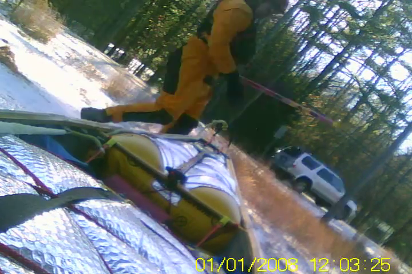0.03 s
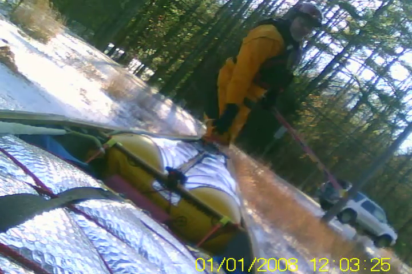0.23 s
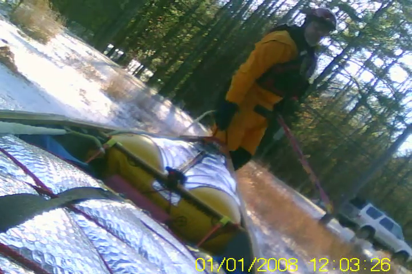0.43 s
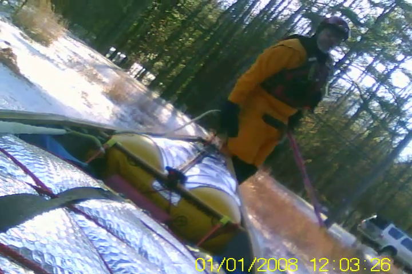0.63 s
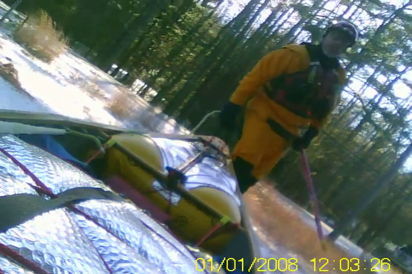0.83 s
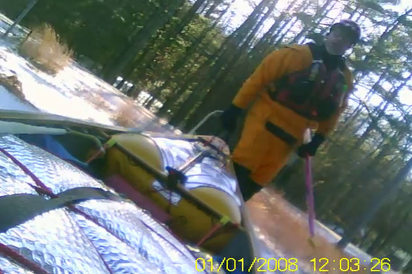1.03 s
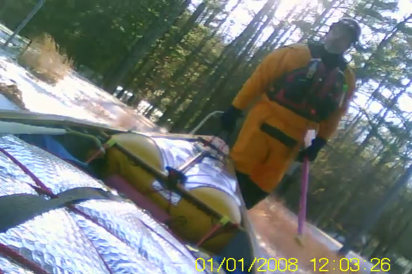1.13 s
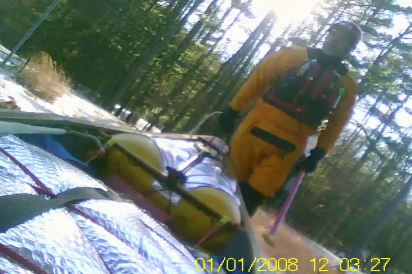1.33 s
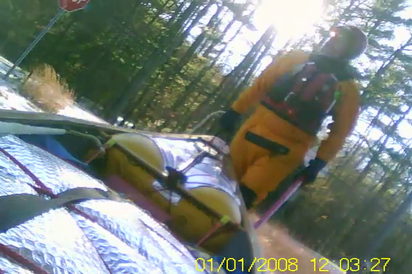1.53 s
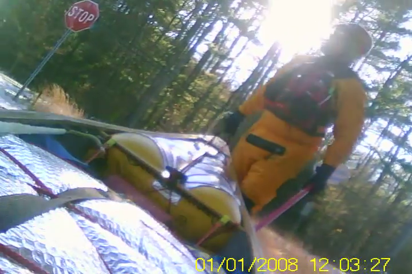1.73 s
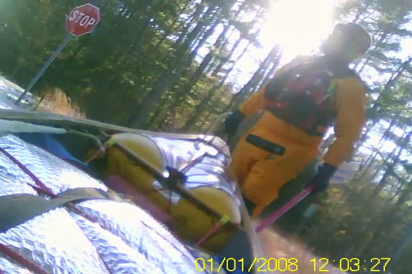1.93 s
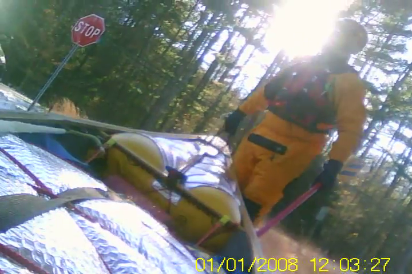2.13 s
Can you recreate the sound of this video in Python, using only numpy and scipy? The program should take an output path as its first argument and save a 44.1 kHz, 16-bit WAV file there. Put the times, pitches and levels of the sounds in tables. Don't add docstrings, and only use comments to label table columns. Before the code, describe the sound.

Rising snow scrape and crunching crusts under a dragged inflatable boat, with low booming rumbles and thumps

```python
import sys
import numpy as np
from scipy import signal
from scipy.io import wavfile

SR = 44100
rng = np.random.default_rng(int(sys.argv[2]) if len(sys.argv) > 2 else 0)


def linear_from_db(decibels):
    return 10 ** (np.asarray(decibels, float) / 20)


def wav_out(sig):
    wavfile.write(sys.argv[1], SR, np.round(np.clip(np.atleast_2d(sig).T, -1, 1) * 32767).astype(np.int16))


N = 97020
CUT_S = 2.06816

# (time [s], crunch peak [dB], drum of the floor [dB], brightness [dB])
CRUSTS = [(0.022, -36.5, -37, 3), (0.064, -47.5, -35.5, 7), (0.1, -35.5, -39, -5), (0.131, -93, -54, 2),
          (0.164, -58, -37, 9), (0.23, -31.5, -24.5, -2.5), (0.299, -34.5, -25.5, -2),
          (0.421, -37, -45.5, -2.5), (0.563, -18.5, -35, -15), (0.604, -37.5, -17.5, -4),
          (0.638, -33.5, -21.5, -18), (0.673, -24, -22.5, -4), (0.723, -13.5, -26.5, -6),
          (0.791, -30, -29, -20), (0.845, -32.5, -29.5, -20), (0.919, -10.5, -14.5, -8.5),
          (0.954, -23, -25.5, -10), (0.988, -15.5, -31, -9.5), (1.021, -29, -49, 2), (1.07, -17, -25, -16),
          (1.098, -22, -29, -3), (1.215, -28, -25, -17), (1.248, -32, -31.5, 4.5), (1.339, -21, -16.5, 0),
          (1.353, -17, -34, 2.5), (1.572, -30.5, -35, -3), (1.639, -43, -20.5, 15),
          (1.662, -32.5, -19, 10.5), (1.762, -36, -39, 7), (1.902, -25, -35, -22)]
# (time [s], swing [dB], frequency [Hz], time to fall 60 dB [s])
LURCHES = [
    (1.953, -11, 23, .25),
    (2.0375, .5, 29.5, 1.),
]


def rms_one(x):
    return x / np.sqrt(np.mean(x ** 2) + 1e-20)


def band(x, hz, width_hz):
    r = np.exp(-np.pi * width_hz / SR)
    top = np.array([1, 0, -1]) * (1 - r * r) / 2
    bottom = [1, -2 * r * np.cos(2 * np.pi * hz / SR), r * r]
    return signal.lfilter(top, bottom, x + 1e-18)


def filtered(x, order, hz, kind="low"):
    return signal.sosfilt(signal.butter(order, hz, kind, fs=SR, output="sos"), x)


def ring(x, hz, t60):
    r = linear_from_db(-60 / (t60 * SR))
    w = 2 * np.pi * hz / SR
    return signal.lfilter([0, np.sin(w)], [1, -2 * r * np.cos(w), r * r], x + 1e-18)


def struck(modes, s, db):
    chance = rng.standard_normal((len(s), len(modes)))
    out = 0
    for k, (hz, level_db, t60) in enumerate(modes):
        push = np.zeros(N)
        push[(s * SR).astype(int)] = linear_from_db(db + level_db + 0.51 * chance[:, k])
        out = out + ring(push, hz, t60)
    return out


def drift(rate):
    r = np.exp(-2 * np.pi * rate / SR)
    slow = signal.lfilter([1], [1, -2 * r, r * r], rng.standard_normal(N + SR))
    return rms_one(slow[SR:])


def resonate(x, rows, wander_db=None):
    if wander_db is None:
        wander_db = np.zeros((len(rows), 1))
    out = 0
    for k, (hz, width_hz, db) in enumerate(rows):
        wide = 1.46 * width_hz
        once = band(x * linear_from_db(wander_db[k]), hz, wide)
        out = out + (-1) ** k * linear_from_db(db) / np.sqrt(width_hz) * band(once, hz, wide)
    return out


def grains(rate):
    size_db = 1 * np.minimum(rng.exponential(1, N), 5)
    size = linear_from_db(size_db) * rng.choice([-1, 1], N)
    return rms_one(size * (rng.random(N) < rate / SR))


def crust_bursts():
    t = np.arange(N) / SR
    crunch, crisp, crack = np.zeros((3, N))
    for s, db, _, bright_db in CRUSTS:
        age = np.maximum(t - s, 0)
        body = linear_from_db(db - 9.5) * (1 - np.exp(-age / 0.0005)) * np.exp(-age / 0.011)
        crunch += body
        crisp += linear_from_db(bright_db) * body
        crack += linear_from_db(db + 7.5 + bright_db) * (1 - np.exp(-age / 0.002)) * np.exp(-age / 0.0025)
    return crunch, crisp, crack


def squeak(grit):
    t = np.arange(N) / SR
    hz, width_hz, from_s, to_s = 7550, 600, 1.86, 2.03
    tone = rms_one(band(band(grit, hz, width_hz), hz, width_hz))
    fade = np.clip(np.minimum(t - from_s, to_s - t) / .03, 0, 1)
    return linear_from_db(-72) * fade * tone


def snow(vigour_db):
    # (frequency [Hz], width [Hz], level [dB])
    housing_modes = [(321.6, 70, -5.5), (373, 46, -1), (427.6, 45.7, 2.5), (504, 72, -3.5),
                     (619.3, 75.3, -1), (870, 172, -19.5), (1099, 287, -14), (1363, 266, -25),
                     (1696, 225, -17), (2185, 240, -17.5), (2468, 117, -20), (2723, 99, -28)]
    # (frequency [Hz], width [Hz], level [dB])
    sheen_modes = [(3050, 200, -2), (3450, 400, -2), (4150, 400, -5), (4570, 170, -1), (5200, 400, -8)]
    swing = vigour_db - vigour_db.max()
    crunch, crisp, crack = crust_bursts()
    grit = grains(2500)
    clumps = linear_from_db(0.5 * drift(21))
    # (resonances, scrape level in dB, loudness of the breaking crusts)
    parts = [(housing_modes[:6], -29 + 0.84 * swing, crunch),
             (housing_modes[6:], 5.5 + vigour_db, linear_from_db(-16) * (0.54 * crisp + crack)),
             (sheen_modes, -55.5 + 1.9 * swing, linear_from_db(-47) * (0.19 * crisp + crack))]
    out = 0
    for rows, slide_db, burst in parts:
        scale = np.std(resonate(grit, rows))
        wander_db = [2.5 * drift(6.9) for _ in rows]
        out = out + resonate(grit * (linear_from_db(slide_db) * clumps + burst), rows, wander_db) / scale
    notch = band(out, 2000, 230)
    return out - notch + squeak(grit)


def tubes(heave_db):
    # (frequency [Hz], width [Hz], level [dB])
    tube_modes = [(13.2, 42, -11), (30.2, 14.6, 10), (42.24, 9, -3), (59.6, 8.2, -20), (94.9, 11, -13.5),
                  (135.6, 98, -28), (221, 120, -27.5)]
    shake = rng.standard_normal((2, N + SR))
    swing = heave_db - heave_db.mean()
    sway = linear_from_db(-8 + .35 * swing) * rms_one(resonate(shake[0], tube_modes[:2])[SR:])
    boom = linear_from_db(-4.5 + swing) * rms_one(resonate(shake[1], tube_modes[2:])[SR:])
    return linear_from_db(heave_db.mean()) * (sway + boom)


def drum():
    # (frequency [Hz], level [dB], time to fall 60 dB [s])
    floor_modes = [(93.7, 5, 0.38), (126, -14, 0.43)]
    # (frequency [Hz], level [dB], time to fall 60 dB [s])
    board_modes = [(154, -18.5, 0.17), (213.2, -11.5, 0.14), (254.5, -8, 0.055), (423, -10.5, 0.089)]
    s, crunch_db, drum_db, _ = np.transpose(CRUSTS)
    soft = filtered(struck(floor_modes, s, drum_db - 0.5), 2, 113)
    knock = filtered(struck(board_modes, s + .006, crunch_db), 2, 600)
    return -soft - knock


def snaps():
    t, shape = np.arange(N) / SR, np.zeros(N)
    for s, db, _, bright_db in CRUSTS:
        age = np.maximum(t - s, 0) / .003
        shape += linear_from_db(db + bright_db - 27) * age * np.exp(1 - age)
    return filtered(shape * rng.standard_normal(N), 3, [900, 4800], "band")


def lurches():
    t, out = np.arange(N) / SR, np.zeros(N)
    for s, db, hz, t60 in LURCHES:
        age = np.maximum(t - s, 0)
        start = 1 - np.exp(-age / .015)
        out -= linear_from_db(db - 60 * age / t60) * np.sin(2 * np.pi * hz * age) * start
    return out * (t < CUT_S)


def circuit():
    # (frequency [Hz], level [dB])
    whines = [(5599, -83), (7402, -85), (9598, -89)]
    t, ticks = np.arange(N) / SR, np.zeros(N)
    at = np.arange(.0214, CUT_S, 1 / 30)
    ticks[(at * SR).astype(int)] = linear_from_db(-42 + 1.1 * rng.standard_normal(len(at)))
    ticks = 4 * filtered(ticks, 3, [500, 3500], "band")
    hiss_db = -63 - 3.5 * (t > CUT_S)
    hiss = linear_from_db(hiss_db) * signal.lfilter([1], [1, -.4], rng.standard_normal(N))
    whine = sum(np.sqrt(2) * linear_from_db(db) * np.sin(2 * np.pi * hz * t) for hz, db in whines)
    return hiss + ticks + whine


def scene():
    # (time [s], sliding vigour [dB], heave of the tubes [dB])
    haul = [(0.0, -90, -31.5), (0.19, -72.5, -31), (0.49, -62.5, -19.5), (0.62, -59, -24.5),
            (0.79, -66, -21.5), (0.91, -59.5, -28), (0.92, -59.5, -11.5), (1.07, -61.5, -22),
            (1.1, -66, -9.5), (1.21, -52, -18.5), (1.23, -54, -9.5), (1.34, -53.5, -32.5), (1.42, -45, -6),
            (1.43, -48, -18.5), (1.54, -49, -11.5), (1.84, -46, -17), (1.89, -48, -20), (2.06, -48, -10)]
    s, vigour, heave = np.transpose(haul)
    t = np.arange(N) / SR
    moving = t < CUT_S
    vigour = np.where(moving, np.interp(t, s, vigour), -61.5)
    settling = -25 + 4.5 * np.exp(-np.abs(t - CUT_S) / 0.04)
    heave = np.where(moving, np.interp(t, s, heave), settling)
    last_lurch_s = LURCHES[-1][0]
    calm = linear_from_db(-18 * np.clip((t - last_lurch_s) / .012, 0, 1) * moving)
    return (snow(vigour) + calm * tubes(heave) + drum() + lurches() + snaps())[None]


def band_limit(x):
    return signal.sosfilt(signal.butter(12, 12340, fs=SR, output="sos"), x)


def record(dry):
    age = np.arange(N) / SR - CUT_S
    sag = 1 - .5 * np.exp(np.minimum(age, 0) / .0004)
    resume = 1 - np.exp(-np.maximum(age, 0) / .004)
    gain = np.where(age < 0, sag, resume)
    offset = -.0056
    mix = .9 * np.tanh(dry / .9) * gain + circuit() + offset
    return band_limit(filtered(mix, 8, 10360))


dry = scene()
out = record(dry)
wav_out(out)
```